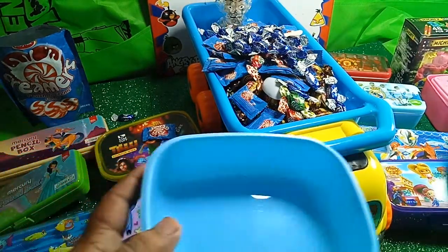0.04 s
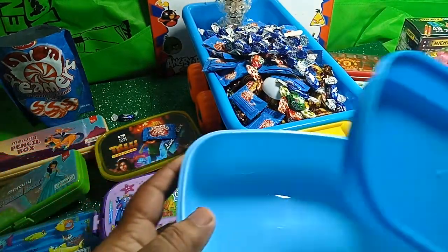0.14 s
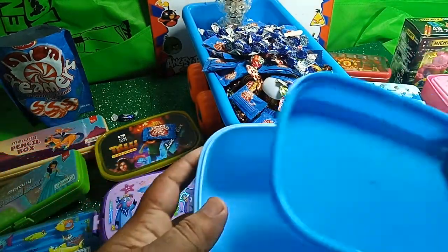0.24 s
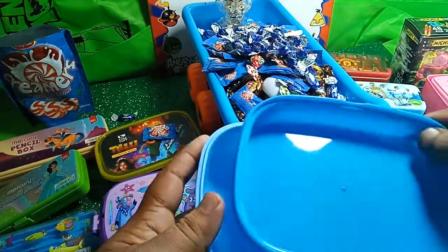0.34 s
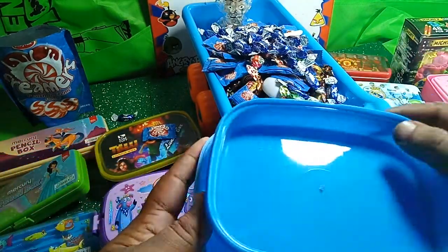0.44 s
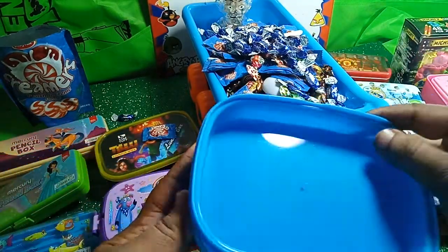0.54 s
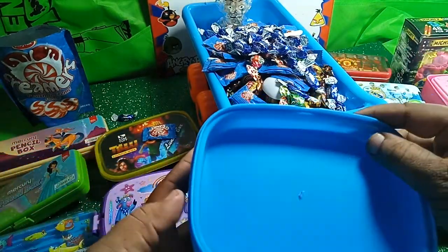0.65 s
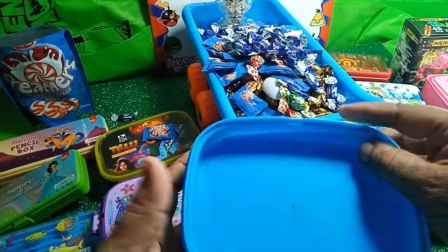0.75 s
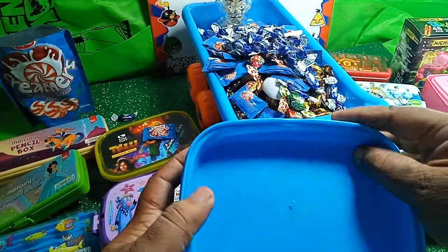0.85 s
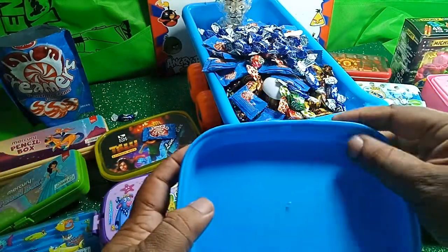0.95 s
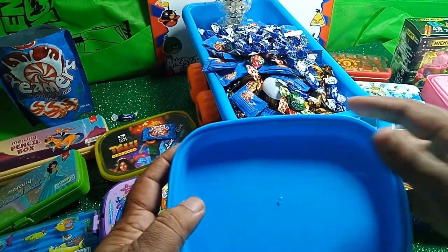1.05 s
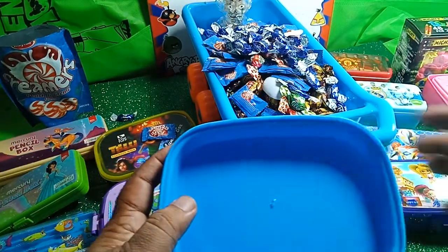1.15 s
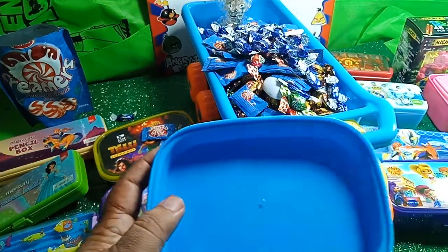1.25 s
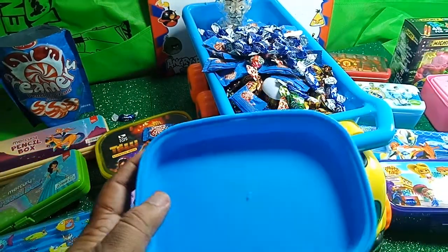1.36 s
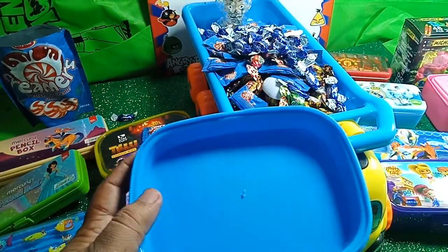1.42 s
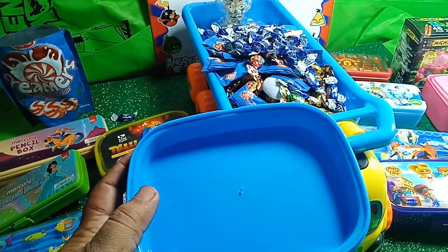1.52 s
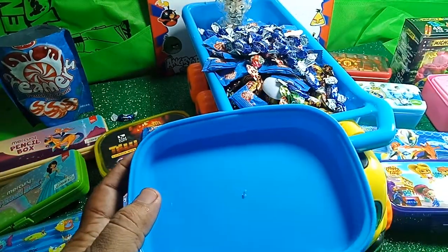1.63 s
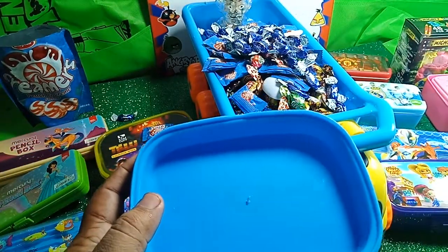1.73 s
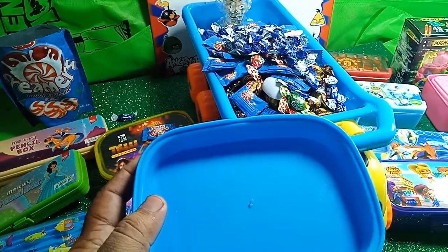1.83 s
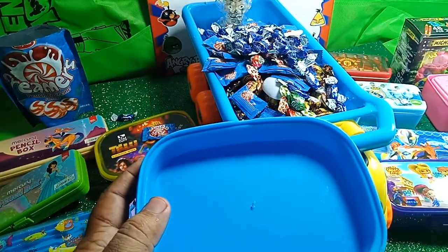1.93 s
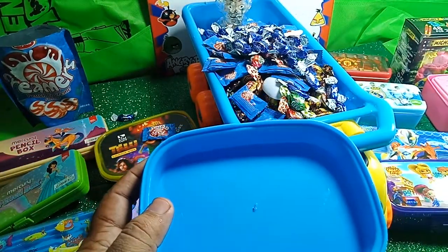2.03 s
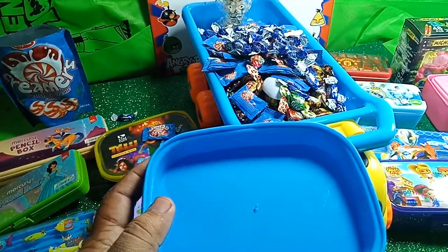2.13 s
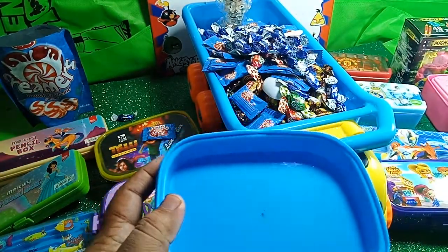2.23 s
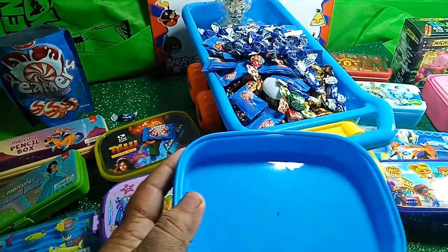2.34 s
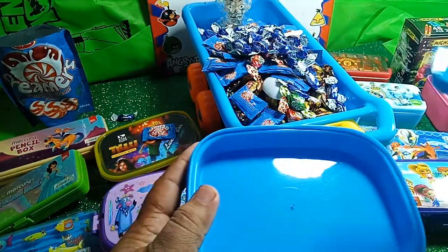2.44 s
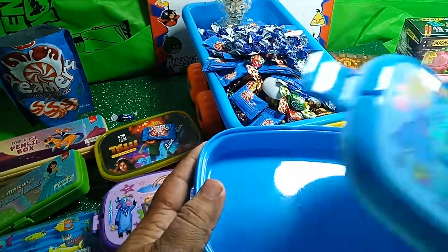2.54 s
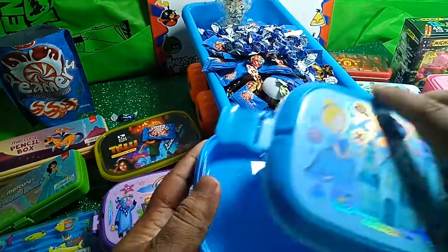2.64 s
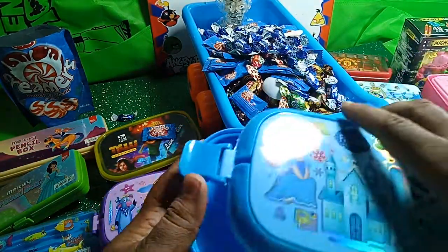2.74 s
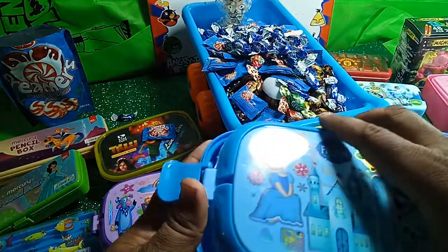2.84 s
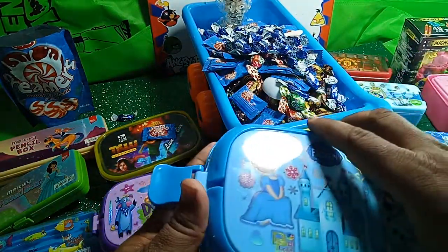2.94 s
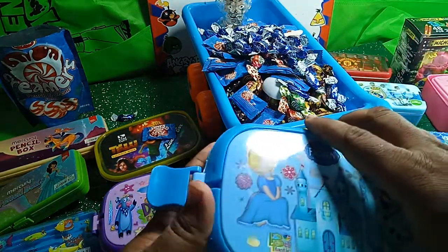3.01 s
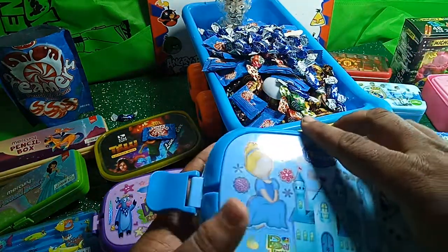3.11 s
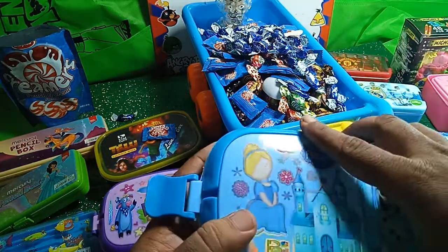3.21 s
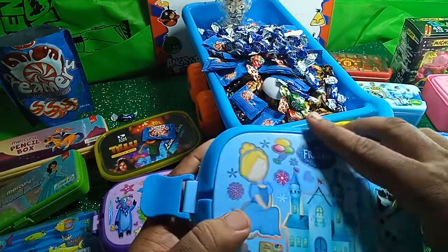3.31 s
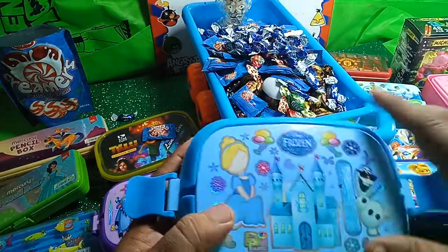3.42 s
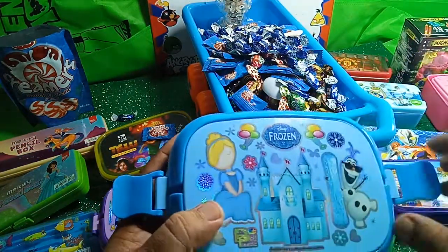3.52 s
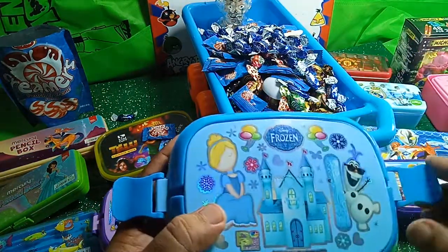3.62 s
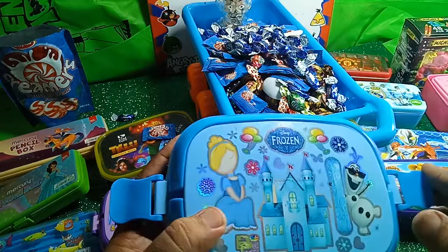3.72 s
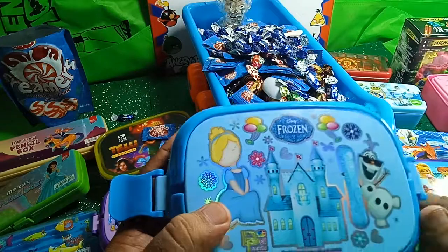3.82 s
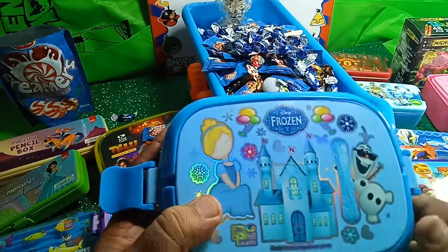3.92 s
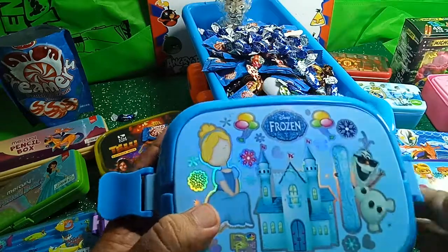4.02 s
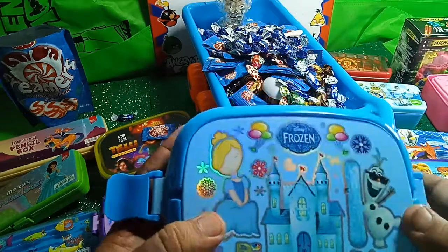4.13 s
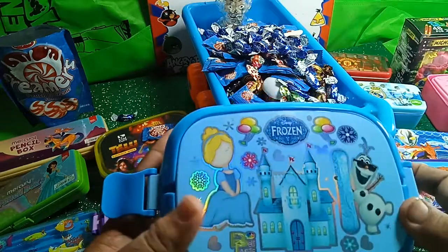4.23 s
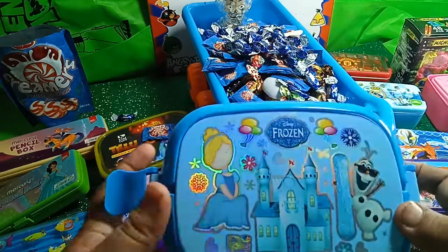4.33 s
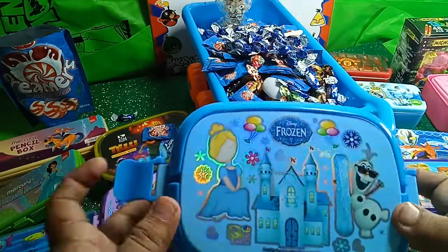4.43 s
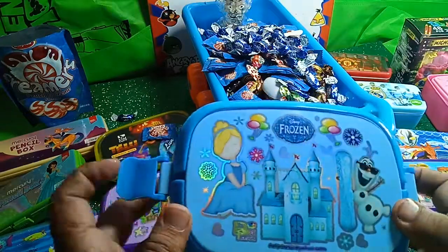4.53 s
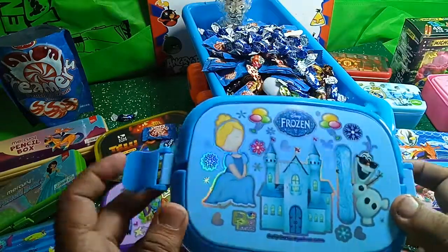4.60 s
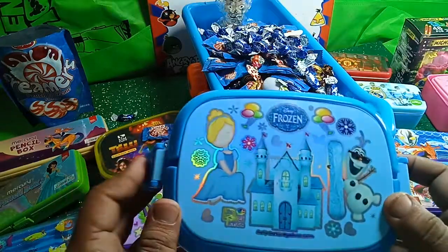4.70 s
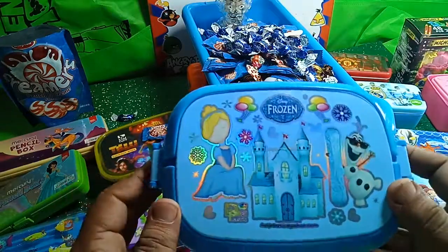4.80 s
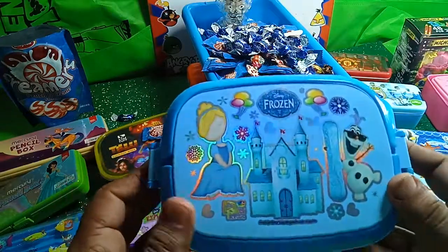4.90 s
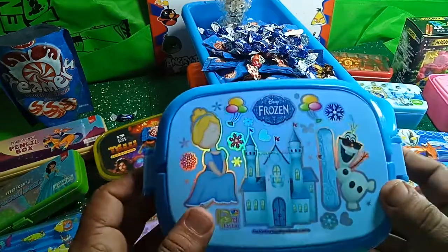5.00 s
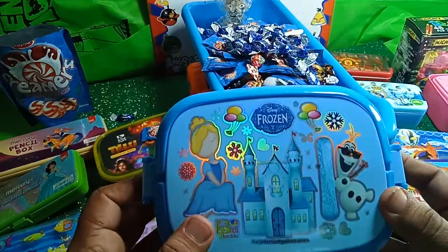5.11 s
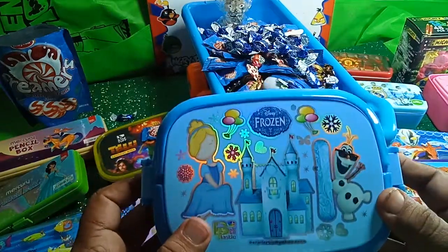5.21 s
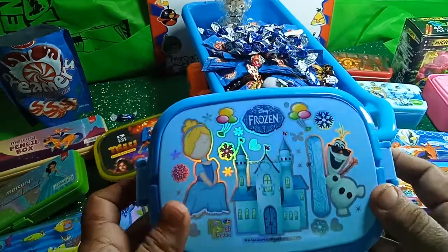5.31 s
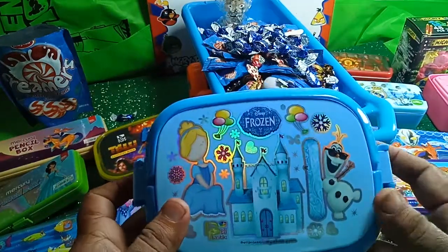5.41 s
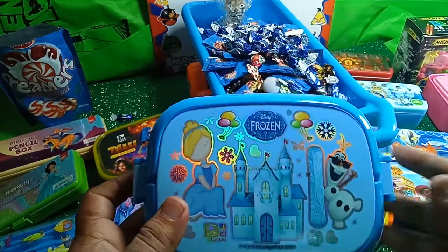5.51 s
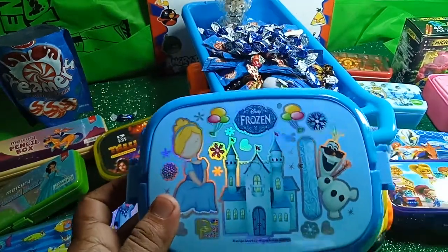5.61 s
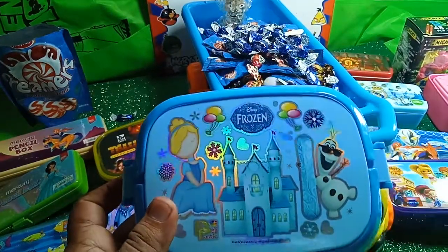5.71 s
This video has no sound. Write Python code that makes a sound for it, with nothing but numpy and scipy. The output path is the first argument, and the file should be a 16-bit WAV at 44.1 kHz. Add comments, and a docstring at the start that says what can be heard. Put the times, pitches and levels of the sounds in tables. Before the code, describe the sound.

A close phone microphone in a small room picks up hard, thin-walled plastic. At about 0.26 s a loud cracking knock with a low thump and brief buzz starts the clatter; hollow clacks follow near 0.4 and 0.5 s, a strong boxy knock at 0.62, then rattling and rubbing until 0.8. A tiny tap comes near 1.0 s. Until 2.65 s there is almost only steady soft hiss and faint, wavering low hum. The lid then arrives: a knock at 2.66, a brighter clack at 2.8, and a quick run of rattling taps around 2.9-3.0 with short rim squeaks, a light scrape at 3.15 and a small tick at 3.6. A loud clip snap cracks at 3.9, followed by faint handling taps. A duller clack at 4.8 and the sharpest, brightest snap at 4.99 ring and buzz briefly. Small finger ticks fade out by 5.5 s, leaving hiss and hum.

```python
"""Hard plastic knocks, close by: hands drop a tray into a lunch box, seat the lid and snap its two clips shut.
Each knock rings the struck panel and the modes of the box; hard ones add a bright crack and a low thump.
Loose parts chatter as dense ticks on the same modes; rubbing rims and buzzing parts are bands of noise.
A small room answers every contact with decaying noise, over a steady hiss and two low wavering hums."""
import sys
import numpy as np
from scipy import signal
from scipy.fft import rfft, irfft
from scipy.io import wavfile

SR = 44100
rng = np.random.default_rng(int(sys.argv[2]) if len(sys.argv) > 2 else 0)


def master(y):
    """Save y as 16-bit WAV."""
    cut = np.clip(np.atleast_2d(y).T, -1, 1)
    pcm = np.round(cut * 32767)  # scale
    wavfile.write(sys.argv[1], SR, pcm.astype(np.int16))


N = 253839  # length in samples
LN_60_DB = np.log(1000)  # a fall of 60 dB, as an exponent


def undb(db):
    """Decibels to gain."""
    return 10 ** (np.asarray(db) / 20)


def level(x, db):
    """Set the rms level."""
    return x * undb(db) / np.sqrt(np.mean(x ** 2))


def band(x, lo_hz, hi_hz):
    """Band-pass with gentle skirts."""
    return signal.sosfilt(signal.butter(2, [lo_hz, hi_hz], "bandpass", fs=SR, output="sos"), x)


def band_around(x, hz, width_hz):
    """Band-pass given by its middle and width."""
    return band(x, hz - width_hz / 2, hz + width_hz / 2)


def ring(t, hz, t60):
    """Damped sine that starts from zero and falls by 60 dB in t60 seconds."""
    return np.sin(2 * np.pi * hz * t) * np.exp(-LN_60_DB * t / t60)


def build_up(t, rise_s):
    """The contact force builds up smoothly over a short time."""
    return 1 - np.exp(-(t / rise_s) ** 2)


# colour of the hiss: (f/Hz, relative density level/dB)
HISS_COLOUR = [(15, -44.5), (25, -6.5), (43, -24.5), (96, -1.5), (174, -7.5), (247, -4), (497, -12),
               (948, -14), (1580, -18.5), (2940, -20.5), (3550, -22.5), (5030, -34), (7750, -38),
               (14000, -37), (15600, -41.5)]
HISS_DB = -61.5


def hiss():
    """Steady noise, coloured by weighting its spectrum."""
    f = np.maximum(np.arange(N // 2 + 1) * SR / N, 1)
    hz, db = np.transpose(HISS_COLOUR)
    colour = undb(np.interp(np.log(f), np.log(hz), db))
    white = rng.standard_normal(N)
    return level(irfft(rfft(white) * colour, N), HISS_DB)


# the steady lower hum: f/Hz, width/Hz, level/dB
LOWER_HUM = (62, 8, -70.5)
# swells and fades of the upper hum: (t/s, level/dB)
UPPER_HUM_SWELL = [(0.0, -77), (0.37, -63.5), (0.72, -72.5), (1.14, -74), (1.67, -68), (2.15, -76),
                   (2.4, -72.5), (2.69, -61.5), (3.08, -58.5), (3.25, -67), (3.68, -62.5), (4.36, -77),
                   (4.96, -70), (5.51, -80.5), (5.75, -71.5)]
UPPER_HUM_HZ, UPPER_HUM_WIDTH_HZ = 101, 7.1


def hums():
    """Two narrow bands of noise waver like unsteady tones; the upper one also swells and fades."""
    low_hz, low_width, low_db = LOWER_HUM
    low = level(band_around(rng.standard_normal(N), low_hz, low_width), low_db)
    high = level(band_around(rng.standard_normal(N), UPPER_HUM_HZ, UPPER_HUM_WIDTH_HZ), 0)
    swell = undb(np.interp(np.arange(N) / SR, *np.transpose(UPPER_HUM_SWELL)))
    return low + swell * high


# the room's answer, band by band: (f/Hz, t60/s, relative level/dB)
ROOM_BANDS = [(266, .2, -11.5), (600, 0.44, -17), (1400, 0.28, -10), (3200, 0.34, -7.5), (5300, .24, -10.5),
              (13000, .12, -19)]
CLUMP_DB, CLUMP_S = 4., 0.0022  # reflections come in uneven clumps
ROOM_BUILD_UP_S = 0.014


def room(dry):
    """Dense reflections, each band dying at its own rate, build up after the first walls."""
    t = np.arange(SR // 2) / SR
    clump_index = (t / CLUMP_S).astype(int)
    clumps = undb(CLUMP_DB * rng.standard_normal(len(t))[clump_index])
    clumps /= np.sqrt(np.mean(clumps ** 2))
    noises = rng.standard_normal((len(ROOM_BANDS), len(t))) * clumps
    tail = np.zeros(len(t))
    for (hz, t60, db), noise in zip(ROOM_BANDS, noises):
        decay = band(noise, hz / 1.5, hz * 1.5) * np.exp(-LN_60_DB * t / t60)
        # weigh the energy against a click passed through a band hz wide
        energy = np.sum(decay ** 2) / np.mean(noise ** 2) * SR / (2 * hz)
        tail += undb(db) * decay / np.sqrt(energy)
    tail *= np.clip(t / ROOM_BUILD_UP_S, 0, 1)
    return signal.fftconvolve(dry, tail)[:N]


# short slides of one rim along another:
# (start t/s, length/s, singing level/dB, panel f/Hz, width/Hz, scratch level/dB)
RIM_SLIDES = [(0.554, 0.051, -38.5, 670, 244, -58), (0.75, 0.03, -41, 700, 400, -43.5),
              (0.931, 0.028, -46, 337, 121, -53), (2.838, 0.028, -43.5, 360, 100, -45.5),
              (2.87, 0.04, -39.5, 888, 90, -67), (3.137, .045, -41, 514, 400, -46),
              (4.755, 0.027, -48.5, 480, 250, -70.5), (4.984, 0.013, -28, 600, 504, -40)]


def slides():
    """Rubbing noise sings in one panel and scratches more broadly."""
    time, out = np.arange(N) / SR, np.zeros(N)
    noise = rng.standard_normal(N)
    scratch = noise
    for _ in range(3):  # three passes steepen the skirts
        scratch = band(scratch, 800, 4200)
    scratch = level(scratch, 0)
    for start, length, db, hz, width, scratch_db in RIM_SLIDES:
        to_nearest_end = np.minimum(time - start, start + length - time)
        press = np.clip(to_nearest_end / .004, 0, 1)
        singing = level(band_around(noise, hz, width), db)
        out += press * (singing + undb(scratch_db) * scratch)
    return out


# a struck clip or panel keeps buzzing against its seat: (t/s, f/Hz, width/Hz, level/dB, t60/s)
SEAT_BUZZES = [(.262, 345, 40.3, -26, 0.14), (.262, 210, 40, -32.5, .12), (.395, 1902, 249.6, -39.5, .15),
               (.623, 6530, 2200, -56, .16), (2.806, 362.4, 60, -36.5, .15), (3.908, 900, 365, -30, 0.2),
               (4.798, 1600, 1200, -36, 0.2), (4.798, 600, 700, -42, .15), (4.995, 1700, 560, -27, 0.32),
               (4.995, 900, 700, -37, .22), (3.908, 3900, 2400, -41, .2), (4.995, 3200, 900, -40, .3),
               (4.995, 5600, 2600, -48, .25)]


def buzzes():
    """A rough ring, made of a band of noise, fades after the blow."""
    time, out, noise = np.arange(N) / SR, np.zeros(N), rng.standard_normal(N)
    for start, hz, width, db, t60 in SEAT_BUZZES:
        since = np.maximum(time - start, 0)
        fade = np.clip(since / 0.0027, 0, 1) * np.exp(-LN_60_DB * since / t60)
        rough = band_around(band_around(noise, hz, width), hz, width)
        out += fade * level(rough, db)
    return out


# modes of box, tray and lid, which the knocks ring too;
# the thin walls lose the high ones within tens of cycles: (f/Hz, relative level/dB, t60/s)
BOX_MODES = [(231.95, -17.5, 0.12), (290, -8.5, 0.034), (339.2, -1.5, 0.05), (420, -13, 0.026),
             (518, -9.5, 0.077), (595, -10, .03), (749.3, -3, .03), (740, -7.5, .03), (860, -9, 0.038),
             (992, -8.5, .025), (972, -4, 0.023), (1184.6, -9.5, 0.014), (1341, -6, 0.031),
             (1496, -7.5, 0.029), (1628, -1, 0.027), (1700, -2.5, .016), (1917, -4, 0.027),
             (2224, -2.5, .012), (2494, -4.5, 0.025), (2784, -4.5, 0.017), (3128, -5, 0.019),
             (3432, -1.5, 0.015), (3790, -3.5, 0.017), (3940, -2.5, 0.013), (4350, -2, 0.0081),
             (4750, -9.5, 0.009), (5140, -9, 0.0078)]
# bursts of loose parts chattering and rubbing:
# (peak t/s, relative peak level/dB, brightness level/dB, swell by 60 dB/s, fade by 60 dB/s)
CHATTER_BURSTS = [(.272, -27, -8, .01, .25), (.396, -30, -30, .06, .035), (.466, -33, -30, .09, .2),
                  (.572, -30.5, -10, .06, .065), (.632, -16, -2, .01, .05), (.7, -34, -5, .15, .08),
                  (.638, -28, -5, .01, .45), (.776, -14, -17, .05, .05), (.81, -50, -17, .03, .4),
                  (1.036, -36.5, -17, .4, .16), (2.672, -24, -12, .01, .03), (2.68, -43.5, -20, .01, .2),
                  (2.812, -24, 2, .02, .035), (2.82, -40, -10, .01, .2), (2.914, -23, 0, .065, .075),
                  (2.968, -22.5, -11, .1, .09), (3.192, -51, -10, .01, .11), (3.3, -51.5, -15, .07, .18),
                  (3.42, -49, -18, .4, .15), (3.618, -34.5, -11, .045, .035), (3.84, -39, -9, .075, .16),
                  (4.232, -52, -3, .17, .12), (4.276, -47.5, -13, .06, .2), (4.596, -41.5, -15, .035, .1),
                  (4.766, -37.5, -17, .075, .055), (5.354, -47, -14, .2, .33), (5.528, -58, -18, .6, .08)]
CHATTER_DB = -8  # each half of the chatter, before the burst levels
TICKS_PER_S, TICK_SPREAD_DB, TICK_RISE_S = 690, 3, 0.0013  # light contacts are rounder than blows
CHATTER_HZ, CHATTER_FALL_DB = 650, 4  # driven most near here; loss per octave away from it


def chatter():
    """Dense uneven ticks ring the box in bursts; brightness sets the high modes against the low ones."""
    time, t = np.arange(N) / SR, np.arange(SR // 10) / SR
    happens, side, strength = rng.random((3, N))
    tick_gain = undb(-TICK_SPREAD_DB * np.log(1 - strength))
    ticks = (happens < TICKS_PER_S / SR) * np.sign(side - .5) * tick_gain

    soft = build_up(t, TICK_RISE_S)
    low_modes, high_modes = np.zeros(len(t)), np.zeros(len(t))
    for hz, db, t60 in BOX_MODES:
        octaves_away = abs(np.log2(hz / CHATTER_HZ))
        mode = soft * undb(db - CHATTER_FALL_DB * octaves_away) * ring(t, hz, t60)
        if hz < 1200:
            low_modes += mode
        else:
            high_modes += mode
    dull = level(signal.fftconvolve(ticks, low_modes)[:N], CHATTER_DB)
    bright = level(signal.fftconvolve(ticks, high_modes)[:N], CHATTER_DB)

    out = np.zeros(N)
    for peak, db, bright_db, swell, fade in CHATTER_BURSTS:
        shape = np.exp(-LN_60_DB * np.maximum((peak - time) / swell, (time - peak) / fade))
        out += undb(db) * shape * (dull + undb(bright_db) * bright)
    return out


RISE_S, START_DELAY_S = 0.00047, .0015  # force build-up; each blow starts this long after its listed time
# hard blows also crack at the edges and thump the whole box:
# (t/s, edge crack level/dB, edge fizz level/dB, thump level/dB), as gains before the force build-up
HARD_BLOWS = [(.256, -27, -34.5, -20), (.61, -47, -66, -50), (.62, -47, -60, -40), (.702, -48, -80, -55),
              (2.657, -39.5, -73, -45), (.355, -70, -80, -32), (.764, -56, -70, -28),
              (2.801, -38, -80, -28), (2.828, -53, -75, -55), (2.907, -39, -63, -40),
              (3.902, -25, -43, -19), (4.793, -46, -74, -27), (4.989, -24, -45, -20)]
CRACK_T60_S = .012
THUMP_HZ, THUMP_T60_S = 290, .04


def cracks():
    """A short bright burst of noise from the edges over a low damped thump."""
    out, t = np.zeros(N + SR), np.arange(SR // 8) / SR
    grits = rng.standard_normal((len(HARD_BLOWS), len(t))) * np.exp(-LN_60_DB * t / CRACK_T60_S)
    push = build_up(t, RISE_S)
    for (s, crack_db, fizz_db, thump_db), grit in zip(HARD_BLOWS, grits):
        crack = undb(crack_db) * band(band(grit, 4600, 7600), 4600, 7600)
        fizz = undb(fizz_db) * band(grit, 9000, 15500)
        thump = undb(thump_db) * ring(t, THUMP_HZ, THUMP_T60_S)
        i = int((s + START_DELAY_S) * SR)
        out[i:i + len(t)] += push * (crack + fizz + thump)
    return out[:N]


# centres of thud, hollow body, clack and tick: f/Hz
DRIVE_HZ = [280, 720, 1400, 5600]
# knocks: (t/s, struck panel level/dB, panel f/Hz, panel ring-down by 60 dB/cycles,
# hollow body drive level/dB, clack drive level/dB, fall of the treble above the clack/dB per octave)
KNOCK_LIST = [(.256, 2, 1000, 10, -13, -8, 10), (.298, -26, 1060, 18, -37, -39, 4),
              (.307, -23, 904, 13, -37, -32, 10), (.329, -26, 880, 10, -46, -38, 5),
              (.355, -14, 774, 30, -23, -23, 9), (.383, -40, 607, 9, -11, -26, 15),
              (.387, -2, 815, 17.5, -28, -13, 10), (.455, -38, 762, 8.5, -5, -21, 9),
              (.487, -11.5, 704, 13.7, -24, -26, 23), (.57, -17, 655, 15, -38, -58, 6),
              (.61, -8.5, 740, 17, -33, -18, 10), (.62, 2, 638, 18.7, 3, -14, 2),
              (.667, -15, 617, 17, -23, -37, 6), (.702, -10, 815, 13.4, -13, -38, 6),
              (.764, -17.5, 764, 6, -6, -33, 0), (.771, -11, 476, 18.6, -20, -25, 8),
              (.782, -11, 526, 4.2, -18, -35, 3), (1.018, -31.5, 533, 22, -55, -42, 4),
              (1.028, -35, 291, 23, -28, -35.5, 20), (2.657, -9.5, 614, 7.6, -18, -18, 7),
              (2.801, -9.5, 1835, 14, -24, -24, 4), (2.828, -34, 1800, 10, -35, -24, 12),
              (2.907, -13, 837, 13.5, -13, -23, 3), (2.959, -8, 715, 6.2, -37, -29, 5),
              (2.966, -15.5, 617, 16, -20, -42, 2), (2.974, -19, 643, 10, -23, -47, 5),
              (2.986, -17.5, 744, 18, -23, -48, -2), (3.001, -27, 696, 9, -45, -52, 3),
              (3.065, -35, 566, 17, -42, -47, 14), (3.141, -33, 600, 6, -34, -30, 16),
              (3.15, -36, 266, 8.4, -30, -33, 9), (3.162, -15.5, 282, 7.7, -36, -36, 1),
              (3.173, -29.5, 288, 6.7, -22, -35, 3), (3.294, -38, 298, 16, -46, -48, 17),
              (3.613, -22.5, 480, 9.7, -43, -46, -4), (3.832, -34, 309, 12, -33, -40, 9),
              (3.85, -23.5, 288, 4.6, -27, -29, 26), (3.902, -4.5, 817, 12, -6, -8, 5),
              (4.054, -30, 610, 11.7, -36, -36, 19), (4.225, -37, 510, 4.5, -48, -63, 3),
              (4.271, -40, 235, 14, -45, -59, 7), (4.283, -36, 230, 12, -48, -48, 11),
              (4.592, -34, 248, 9, -52, -61, 0), (4.736, -32.5, 1460, 15, -42, -44, 5),
              (4.759, -33.5, 490, 15, -44, -46, 15), (4.793, 1, 1246, 5, -16, -10, 26),
              (4.859, -29.5, 762, 6.2, -39, -47, 5), (4.957, -32.5, 622, 9, -36, -38, 15),
              (4.989, 4.5, 1570, 12.7, -7, -8, 7), (5.103, -21, 1540, 11, -29, -36, 9),
              (5.128, -28.5, 678, 6.4, -35, -42, 7), (5.23, -35.5, 1700, 11.6, -42, -48, 15),
              (5.317, -35.5, 734, 9, -46, -63, 7), (5.328, -36, 600, 9, -51, -54, 10),
              (5.339, -30, 573, 7, -46, -40, 23), (5.35, -35.5, 266, 6.6, -41, -38, 21),
              (5.363, -34.5, 262, 9.4, -35, -38, 25), (5.39, -37.5, 620, 14.5, -43, -42, 20),
              (5.484, -44, 627, 9.6, -59, -48, 16)]
THUD_DB = -16  # thud against the hollow body
SCATTER_DB, DETUNE = 1.5, .012  # random spread of each mode's level, and of its frequency as a fraction


def knocks():
    """Where a blow lands sets how much it drives each group of modes; a softer contact loses more treble."""
    out, t = np.zeros(N + SR), np.arange(SR // 8) / SR
    hz, db, t60 = np.array(BOX_MODES).T[:, :, None]
    chance = rng.standard_normal((len(KNOCK_LIST), 2, len(BOX_MODES), 1))
    sign = (-1.) ** np.arange(len(BOX_MODES))[:, None]  # neighbouring modes start in opposite directions
    push = build_up(t, RISE_S)
    for knock, (detune, scatter) in zip(KNOCK_LIST, chance):
        s, panel_db, panel_hz, cycles, hollow_db, clack_db, fall_db = knock
        tick_db = clack_db - 2 * fall_db  # two octaves above the clack
        drive_db = [hollow_db + THUD_DB, hollow_db, clack_db, tick_db]
        mode_db = np.interp(np.log(hz), np.log(DRIVE_HZ), drive_db) + db + SCATTER_DB * scatter
        modes = sign * undb(mode_db) * ring(t, hz * (1 + DETUNE * detune), t60)
        body = np.sum(modes, axis=0)
        panel = undb(panel_db) * ring(t, panel_hz, cycles / panel_hz)
        i = int((s + START_DELAY_S) * SR)
        out[i:i + len(t)] += push * (body + panel)
    return out[:N]


SMALL_BOX_HZ = 157  # a small box radiates little below this


def scene():
    """The box and its room's answer, over the hiss and hums."""
    contacts = slides() + buzzes() + chatter() + cracks() + knocks()
    radiate = signal.butter(4, SMALL_BOX_HZ, "highpass", fs=SR, output="sos")
    box = signal.sosfilt(radiate, contacts)
    return (hiss() + hums() + room(box) + box)[None]


TOP_HZ = 15700


def record(dry):
    """The phone clips at full scale, then a steep low-pass cuts the top."""
    clipped = np.clip(dry, -1, 1)
    low_pass = signal.ellip(10, .2, 80, TOP_HZ, fs=SR, output="sos")  # ripple, then stop-band depth in dB
    return signal.sosfilt(low_pass, clipped)


dry = scene()
out = record(dry)
master(out)
```